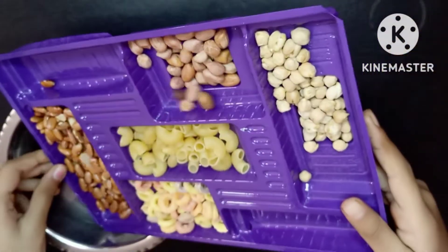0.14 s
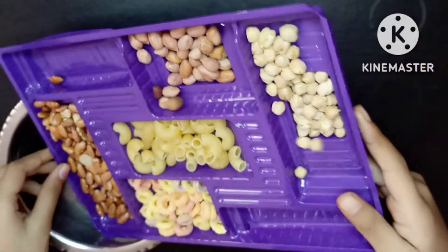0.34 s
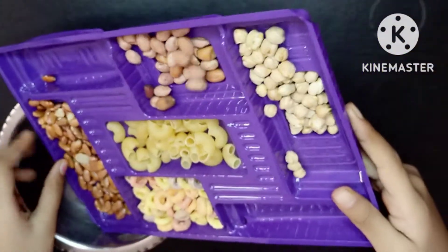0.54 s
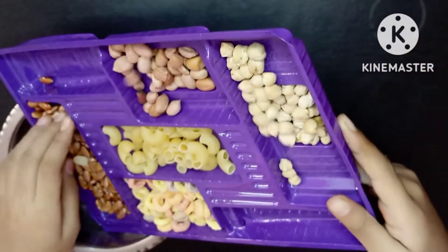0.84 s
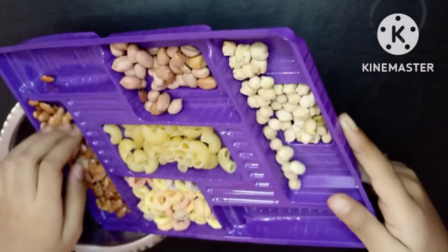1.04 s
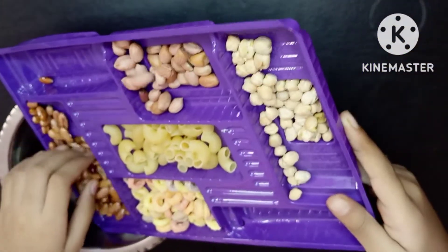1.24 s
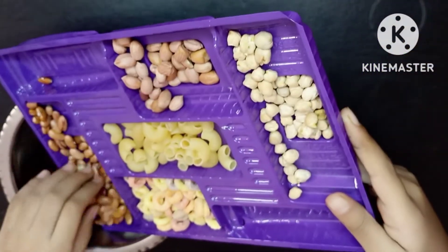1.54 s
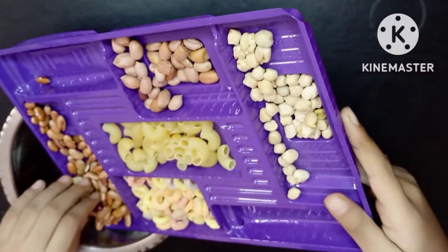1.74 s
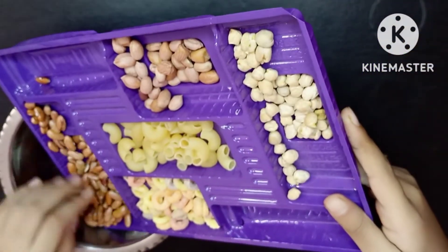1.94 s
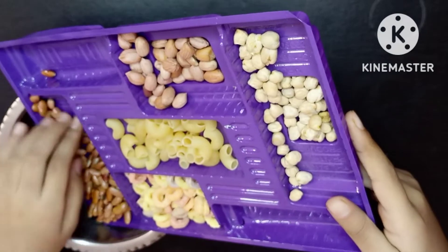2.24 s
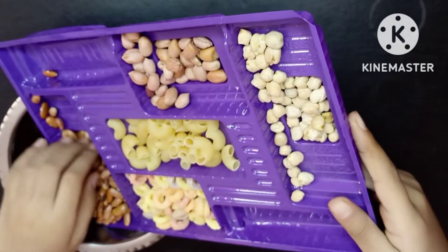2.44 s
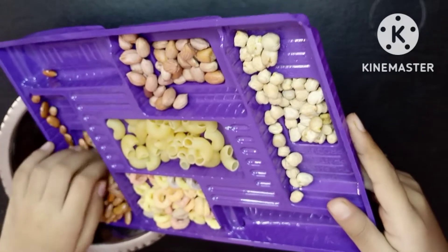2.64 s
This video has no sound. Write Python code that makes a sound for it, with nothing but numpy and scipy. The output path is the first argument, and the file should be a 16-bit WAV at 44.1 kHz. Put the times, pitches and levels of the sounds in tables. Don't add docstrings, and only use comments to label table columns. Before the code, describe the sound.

Dry beans rattle along a thin plastic tray, then spill with bright clinks into a steel bowl

```python
import sys
import numpy as np
from scipy import signal
from scipy.io import wavfile

SR = 44100
rng = np.random.default_rng(int(sys.argv[2]) if len(sys.argv) > 2 else 0)


def volts(x):
    e = np.asarray(x, float) / 20
    return 10 ** e


def output_pcm(signal):
    pcm = np.clip(np.atleast_2d(signal).T, -1, 1) * 32767
    wavfile.write(sys.argv[1], SR, np.round(pcm).astype(np.int16))


N = 123479


def rms_one(x):
    return x / np.sqrt(np.mean(x ** 2) + 1e-20)


def at(rows, s):
    return np.interp(s, *np.transpose(rows))


def colour(points, hz):
    point_hz, point_db = np.transpose(points)
    return np.interp(np.log(hz), np.log(point_hz), point_db)


def drift(rate_hz, s):
    knots = rng.standard_normal(400)
    return np.interp(s * rate_hz, np.arange(400), knots)


def sample_of(s):
    return np.clip((s * SR).astype(int), 0, N - 1)


def grains(start_s, end_s, sizes_db, count):
    return rng.uniform(start_s, end_s, count), sizes_db * np.minimum(rng.exponential(1, count), 2.0)


def bounce(s, db, count):
    gap_s, loss_db = 0.0028, 7.5
    gaps = gap_s * rng.uniform(.3, 1.9, (len(s), count))
    times = s[:, None] + np.cumsum(gaps, axis=1) - gaps[:, :1]
    loss = loss_db * np.arange(count) + rng.normal(0, 0.19, gaps.shape)
    levels = db[:, None, :] - loss[:, :, None]
    return times.ravel(), levels.reshape(-1, db.shape[1])


def strike(s, db, hz, t60):
    out, where = np.zeros(N), sample_of(s)
    gains = volts(db) * rng.choice([-1, 1], db.shape)
    for k in range(len(hz)):
        r = volts(-60 / (t60[k] * SR))
        w = 2 * np.pi * hz[k] / SR
        clicks = np.bincount(where, gains[:, k], N)
        out += signal.lfilter([0, np.sin(w)], [1, -2 * r * np.cos(w), r * r], clicks + 1e-18)
    return out


def rattle(s, db, hz, t60):
    tick_db = 1
    out, where = np.zeros(N), sample_of(s)
    white = rng.standard_normal((2, N))
    half = np.sqrt(hz[1] / hz[0])
    for k in range(len(hz)):
        fall = volts(-120 / (t60[k] * SR))
        early = np.maximum(where - int(.3 * SR / (hz[k] * (half - 1 / half))), 0)
        hits = np.bincount(early, volts(2 * db[:, k]), N) + 1e-18
        power = signal.lfilter([1], [1, -fall], hits)
        tick = volts(tick_db) * np.sqrt(hits / (1 - fall)) * np.sign(white[0])
        band = signal.butter(2, [hz[k] / half, hz[k] * half], "band", fs=SR, output="sos")
        out += signal.sosfilt(band, np.sqrt(power) * white[k % 2] + tick)
    return out


def lift(x, peaks):
    for hz, width_hz, db in peaks:
        x = x + (volts(db) - 1) * signal.lfilter(*signal.iirpeak(hz, hz / width_hz, fs=SR), x)
    return x


def rumble():
    # columns time_s, level_db
    grip = [(0, -92.5), (.45, -72.5), (.65, -85), (.8, -73), (.98, -75), (1.04, -66), (1.1, -78),
            (1.4, -72), (1.75, -74.5), (1.9, -81.5), (2.51, -81), (2.55, -61), (2.585, -82), (2.645, -62),
            (2.68, -70), (2.73, -60), (2.8, -68)]
    low_hz, high_hz, hiss_db = 52, 124.5, -98
    t = np.arange(N) / SR
    band = signal.butter(2, [low_hz, high_hz], "band", fs=SR, output="sos")
    low = signal.sosfilt(band, rng.standard_normal(N))
    hiss = signal.lfilter([1], [1, -.97], rng.standard_normal(N))
    press_db = at(grip, t) + 0.67 * drift(20, t)
    return volts(press_db) * rms_one(low) + volts(hiss_db) * hiss


def room(x):
    t60_s, dull_hz, level_db = 0.26, 8300, -13
    t = np.arange(SR // 3) / SR
    tail = rng.standard_normal(len(t)) * volts(-60 * t / t60_s) * (t > .003)
    tail = signal.lfilter(*signal.butter(1, dull_hz, fs=SR), tail)
    return volts(level_db) * signal.fftconvolve(x, tail / np.sqrt(np.sum(tail ** 2)))[:N]


def bumps():
    # columns start_s, level_db, pitch_hz, t60_s (time to fade by 60 dB)
    rim_bumps = [
        (0.214, -34, 250, 0.23),
        (.355, -32.5, 260, 0.065),
        (.454, -32.5, 267.3, 0.21),
        (1.38, -37, 350, 0.19),
        (1.446, -32, 258, 0.051),
        (1.965, -31, 390, 0.03),
        (2.096, -36, 390, .04),
        (2.645, -41, 260, 0.033),
    ]
    out = np.zeros(N)
    for s, db, hz, t60 in rim_bumps:
        times, levels = bounce(np.array([s]), np.array([[db, db]]), count=2)
        out += rattle(times, levels, hz * np.array([.87, 1.15]), [t60] * 2)
    return out


def bowl():
    # columns start_s, peak_db, brightest_hz, depth_db (strength of the low part)
    drops = [(1.384, -24.5, 6880, -15), (1.4487, -24, 6800, -11), (1.471, -28, 7000, -4),
             (1.499, -42, 6800, 5), (1.4803, -19.5, 11700, -43), (1.516, -11.5, 7800, -8.5),
             (1.5221, -11.5, 8300, -12), (1.544, -22, 12700, -1), (1.6095, -22.5, 7140, -1),
             (1.6121, -13.5, 8770, -7), (1.6596, -13, 8850, -18), (1.68, -37, 5400, 0),
             (1.7092, -31, 5540, 5.5), (1.7438, -18, 12300, -8), (1.802, -21, 11300, -35),
             (1.832, -21.5, 5502, -11), (1.841, -25, 11700, -28), (1.8493, -17, 11400, -6.5),
             (1.888, -19, 11150, -34), (1.9033, -13.5, 12000, -22), (1.9105, -15, 11500, -40),
             (1.926, -18.5, 5000, -13), (1.933, -16, 5200, -20), (1.9632, -13.5, 11600, -41),
             (1.99, -35, 5950, -1), (2.032, -19.5, 11400, -2.5), (2.039, -24, 6950, -4),
             (2.046, -18, 11500, -8), (2.049, -17, 11610, -9), (2.1, -24.5, 11800, -15),
             (2.138, -28.5, 6100, 6), (2.142, -22.5, 4970, -5), (2.15, -20, 9100, -8),
             (2.1817, -22, 11800, -17), (2.228, -28, 5900, -10), (2.4537, -30.5, 13700, -11)]
    # columns time_s, level_db
    spill = [
        (1.371, -73.5),
        (1.47, -44),
        (1.55, -49),
        (1.74, -44.5),
        (1.92, -37.5),
        (2.0, -39.5),
        (2.17, -42.5),
        (2.27, -50),
        (2.439, -67.5),
    ]
    # columns pitch_hz, level_db, t60_s
    bowl_tones = [(265, -28, .12), (1860, -22, .06), (3196, -11, .13), (4343, -11.5, .1), (4890, -13, .09),
                  (5490, -11, .09), (5822, -9, .09), (5980, -9, .09), (6935, -11, .08), (7470, -12, .08),
                  (8930, -11, .05), (9750, -12, .05), (11750, -8, .05), (15200, -10, .07)]
    # columns pitch_hz, level_db (per Hz)
    crack_colour = [(1470, -43), (2500, -54), (3300, -12), (4030, -15), (5660, -8.5), (8140, -11),
                    (12000, -9.5), (13900, -14), (15800, -4)]
    crack_db, crack_ring_s, focus_db, focus_octaves = -9, 0.059, 9.5, 0.14
    ring_db, filling_db_per_s = -17.5, -6
    patter_db, chime_db, belly_db, belly_ring_s = -0.5, -10.5, -17.5, 0.26

    hz = np.geomspace(2700, 15400, 18)
    body = colour(crack_colour, hz)
    tone_hz, tone_db, t60 = np.transpose(bowl_tones)
    s, db, peak_hz, depth = np.transpose(drops)
    depth = depth - np.median(depth)

    lean = np.clip(np.log2(8000 / hz), 0, 1)
    octaves_off = np.log2(hz / peak_hz[:, None])
    focus = focus_db * np.exp(-.5 * (octaves_off / focus_octaves) ** 2)
    crack = db[:, None] + crack_db + body + focus + np.outer(depth, lean)
    filled_db = db + filling_db_per_s * (s - s[0])
    ring = filled_db[:, None] + ring_db + tone_db + np.outer(depth, tone_hz < 7000)
    s_crack, crack = bounce(s, crack + rng.normal(0, 3.4, crack.shape), count=3)
    s_ring, ring = bounce(s, ring + rng.normal(0, 2, ring.shape), count=2)

    t, size = grains(spill[0][0], spill[-1][0], 3.5, count=420)
    size = (size + at(spill, t) + patter_db)[:, None]
    patter = size + body + rng.normal(0, 3.3, (len(t), len(hz)))
    chime = size + chime_db + tone_db + rng.normal(0, 1.3, (len(t), len(t60)))
    belly = size + belly_db + rng.normal(0, 2.9, (len(t), 4))
    cracks = rattle(np.r_[s_crack, t], np.r_[crack, patter], hz, np.full(len(hz), crack_ring_s))
    low = rattle(t, belly, np.geomspace(200, 410, 4), [belly_ring_s] * 4)
    return cracks + low + strike(np.r_[s_ring, t], np.r_[ring, chime], tone_hz, t60)


def hollow(x):
    hz, width_hz, depth = 520, 480, 0.96
    over = np.interp(np.arange(N) / SR, [1.5, 1.6, 2.18, 2.24], [0, 1, 1, 0])
    return x - depth * over * signal.lfilter(*signal.iirpeak(hz, hz / width_hz, fs=SR), x)


def panels():
    # columns start_s, peak_db, pitch_hz
    panel_knocks = [(0.052, -38.5, 646), (0.117, -36, 666), (0.23, -28, 920), (0.294, -31, 690),
                    (0.311, -26, 2680), (0.331, -26.5, 2020), (0.454, -36, 890), (0.529, -30, 1600),
                    (0.665, -31.5, 1590), (0.674, -28, 2020), (0.688, -33, 1560), (0.725, -21.5, 2020),
                    (0.769, -35, 2310), (0.879, -33, 2180), (0.9, -31, 2020), (0.954, -35, 1430),
                    (0.982, -33, 1860), (0.999, -25, 2020), (1.01, -32, 1910), (1.017, -21, 2110),
                    (1.032, -39, 2070), (1.05, -21, 2060), (1.111, -28, 1930), (1.135, -20.5, 2054),
                    (1.159, -28, 1670), (1.207, -29.5, 2630), (1.252, -24, 2330), (1.265, -26, 2200),
                    (1.367, -24, 2120), (1.441, -22, 1780), (1.447, -23.5, 1960), (1.52, -26, 2350),
                    (1.579, -22.5, 2350), (1.611, -18.5, 1870), (1.657, -27, 2120), (1.709, -25, 1872),
                    (1.801, -33, 1790), (1.84, -22.5, 1840), (1.878, -29, 2000), (1.89, -22.5, 1970),
                    (1.927, -22.5, 1730), (2.017, -25.5, 1880), (2.037, -25.5, 1760), (2.059, -21.5, 1980),
                    (2.087, -27, 1870), (2.094, -23, 1850), (2.142, -27, 2080), (2.208, -36, 2050),
                    (2.489, -28.5, 2620), (2.511, -23, 2700), (2.61, -27, 2610)]
    level_db, rise_cycles, ring_s = -5, 0.72, .018
    s, db, hz = np.transpose(panel_knocks)[:, :, None]
    t = np.arange(SR // 20) / SR
    shape = (1 - np.exp(-t * hz / rise_cycles)) * volts(-60 * t / ring_s)
    tone = np.sin(2 * np.pi * hz * t) + 0.24 * np.sin(2 * np.pi * 1.157 * hz * t)
    where = (s * SR).astype(int) + np.arange(len(t))
    knocks = volts(db + level_db) * shape * tone
    return np.bincount(where.ravel(), knocks.ravel(), N + SR)[:N]


def tray():
    # columns time_s, level_db
    stir = [(0, -82), (.11, -76.5), (.16, -60), (.23, -44.5), (.35, -57), (.43, -54), (.46, -47.5),
            (.63, -54.5), (.83, -56.5), (.9, -48.5), (1.02, -39), (1.27, -45.5), (1.36, -47.5),
            (1.46, -41.5), (2.2, -41), (2.33, -54.5), (2.51, -44), (2.68, -49)]
    # columns start_s, peak_db, brightness_db
    tray_knocks = [(0.051, -52, -20), (0.117, -40.5, -17.5), (0.135, -40, -13), (0.148, -24, -17),
                   (0.231, -22.5, -13), (0.294, -25, -13.5), (0.311, -26.5, -13), (0.332, -22, -19),
                   (0.442, -26, -17), (0.456, -23.5, -14.5), (0.501, -30, -33), (0.515, -25, -15.5),
                   (0.5295, -19.5, -14), (0.569, -27.5, -18), (0.665, -18, -17), (0.674, -34, -42),
                   (0.691, -22.5, -34), (0.725, -15, -15), (0.769, -23, -12), (0.849, -31.5, -18),
                   (0.879, -21, -18.5), (0.899, -30, -8.5), (0.953, -25, -7.5), (0.969, -41, -11),
                   (0.982, -24, -13), (0.999, -22.5, -14), (1.051, -23, -12), (1.112, -23, -48),
                   (1.135, -27.5, -32), (1.159, -22.5, -10.5),
                   (1.206, -37, 6), (1.25, -26.5, -5), (1.334, -33.5, -13), (1.367, -24.5, -7),
                   (1.445, -23.5, -48), (1.518, -17, -36), (1.576, -21, -11), (1.608, -34, 1),
                   (1.709, -22.5, -22.5), (2.475, -32, -4), (1.839, -35, 3.5), (1.926, -36, -0.5),
                   (2.093, -31, -18), (2.142, -25.5, -26), (2.208, -21, -10), (2.36, -30, -10),
                   (2.393, -26, -7.5), (2.437, -35.5, -7), (2.49, -24.5, -12), (2.511, -22.5, -3.5),
                   (2.579, -33, -7), (2.612, -30.5, -10), (2.694, -31.5, -6.5), (2.756, -24.5, -12)]
    # columns pitch_hz, level_db (per Hz)
    tray_colour = [(300, -19.5), (620, -8.5), (1300, -9.5), (2500, -10.5), (4900, -18), (8500, -21),
                   (13000, -38.5), (15800, -34)]
    # columns pitch_hz, width_hz, lift_db
    sharp_peaks = [(911, 46, 5.5), (2020, 800, 5.5), (6500, 980, 7), (15100, 250, 13.5)]
    ring_s, ring_cycles = 0.036, 9.1
    knock_db, dull_db_per_octave, scatter_db = 0.5, -4.5, 2
    roll_db, roll_sizes_db, clumps_db = 3, 3.8, 2.5

    hz = np.geomspace(390, 15400, 22)
    t60 = ring_s + ring_cycles / hz
    body = colour(tray_colour, hz) - 10 * np.log10(t60 / 0.019)

    s, db, bright = np.transpose(tray_knocks)
    lean = np.clip(np.log2(hz / 2500) / 0.76, 0, 1)
    dull = dull_db_per_octave * np.maximum(np.log2(hz / 8000), 0)
    db = db[:, None] + knock_db + body + dull + np.outer(bright - np.median(bright), lean)
    s, db = bounce(s, db + rng.normal(0, scatter_db, db.shape), count=3)

    t, size = grains(0, N / SR, roll_sizes_db, count=1700)
    size = size + clumps_db * drift(35.07, t) + at(stir, t) + roll_db
    roll = size[:, None] + body + rng.normal(0, 4.64, (len(t), len(hz)))
    return lift(rattle(np.r_[s, t], np.r_[db, roll], hz, t60), sharp_peaks)


def scene():
    beans = hollow(tray()) + panels() + bowl() + bumps()
    beans = signal.sosfilt(signal.butter(2, 140, "high", fs=SR, output="sos"), beans)
    return (beans + room(beans) + rumble())[None, :]


def low_pass(x):
    return signal.sosfilt(signal.butter(12, 16810, fs=SR, output="sos"), x)


def record(dry):
    top_hz = 15800
    mix = signal.sosfilt(signal.cheby2(20, 34, top_hz, fs=SR, output="sos"), dry)
    return low_pass(mix)


dry = scene()
out = record(dry)
output_pcm(out)
```